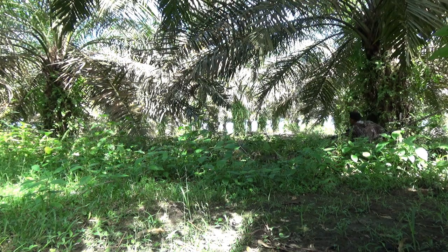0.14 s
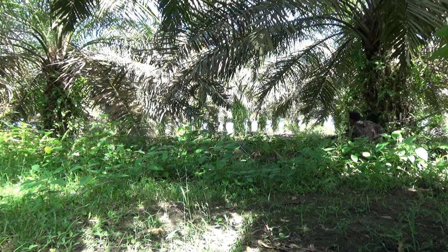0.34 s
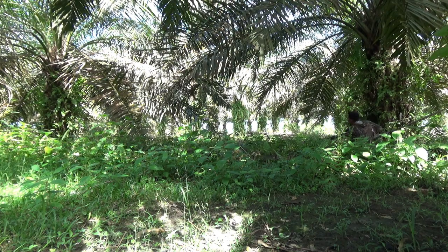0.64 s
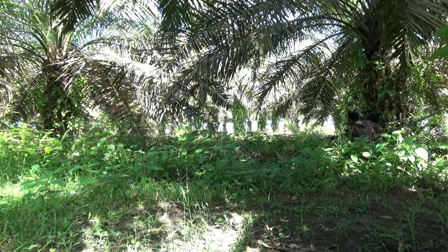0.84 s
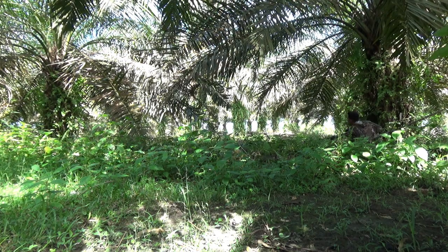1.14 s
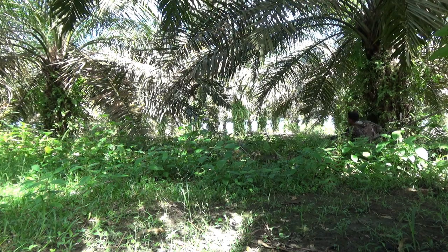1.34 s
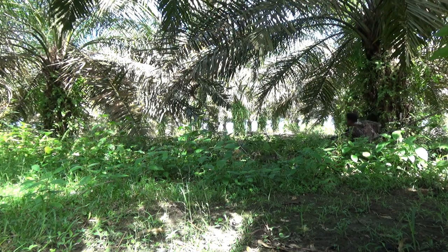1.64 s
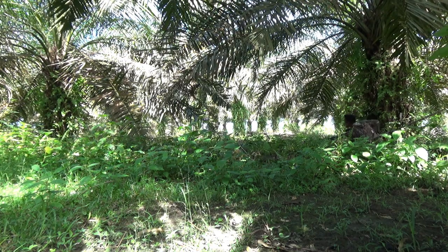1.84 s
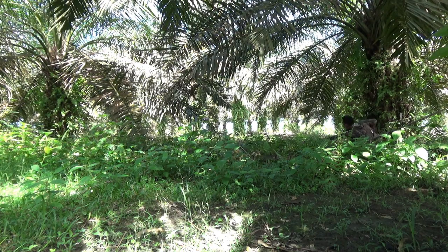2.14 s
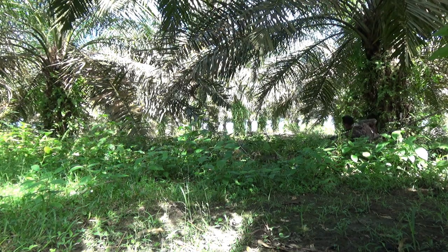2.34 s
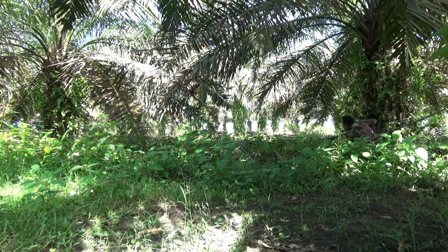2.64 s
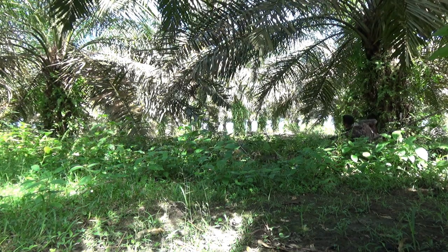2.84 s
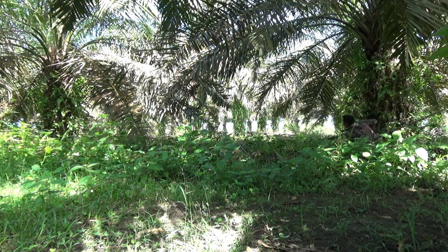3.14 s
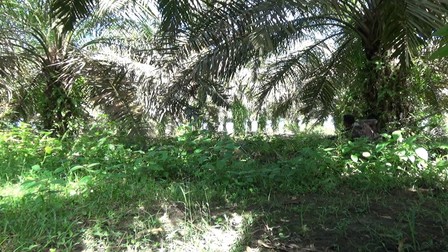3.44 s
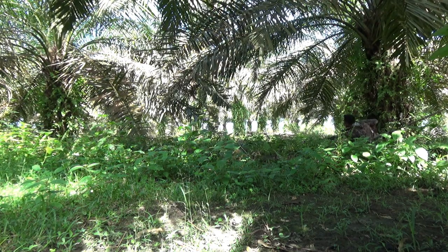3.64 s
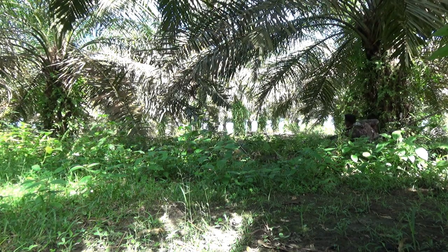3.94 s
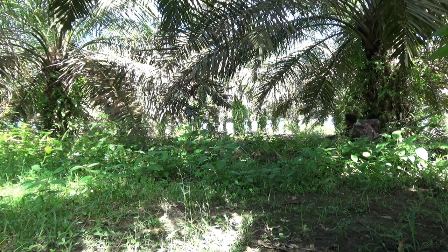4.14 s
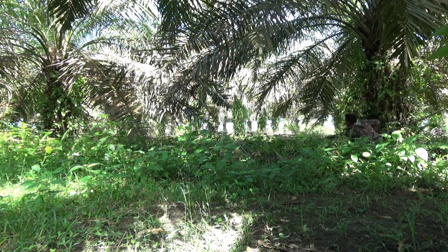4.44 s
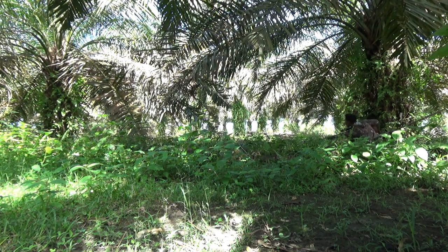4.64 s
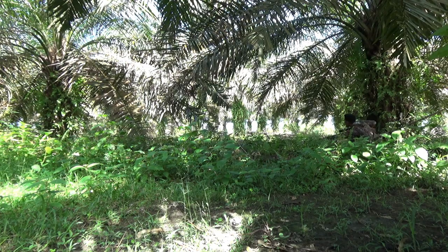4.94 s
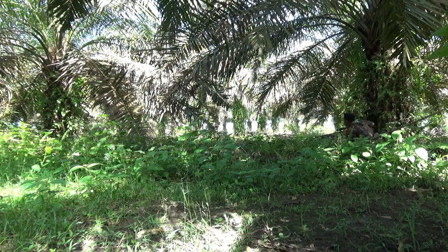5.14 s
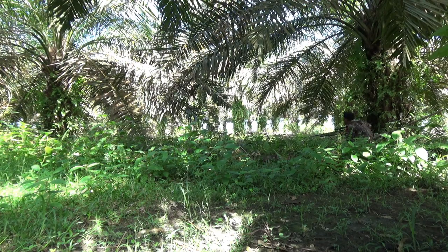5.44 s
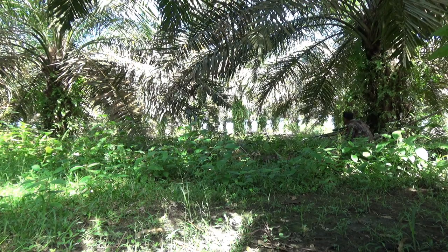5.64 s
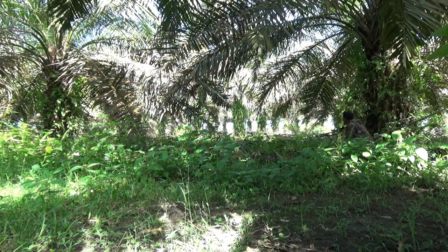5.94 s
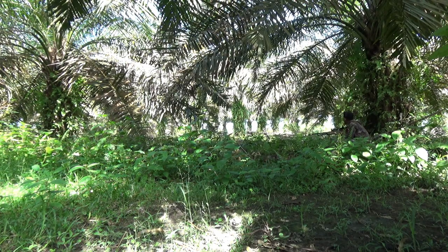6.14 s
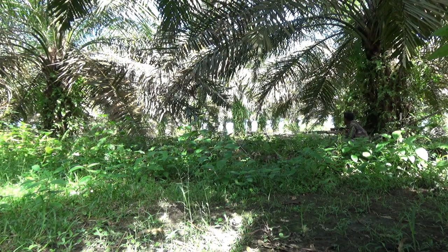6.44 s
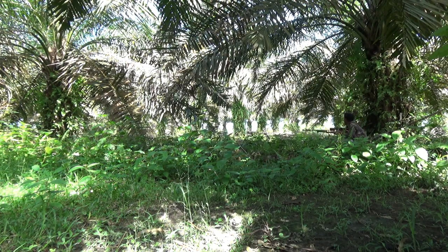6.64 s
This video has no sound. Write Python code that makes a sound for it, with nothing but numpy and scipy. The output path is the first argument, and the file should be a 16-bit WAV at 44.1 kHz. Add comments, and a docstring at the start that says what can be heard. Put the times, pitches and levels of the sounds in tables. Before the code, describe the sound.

Steady high insect drone with throbbing nearer singers, a dry twig tick, two gentle dove calls, and faint rough croaks far off near the end.

```python
"""Midday palm grove

A far cicada chorus, patchy noise in two bands, drones while nearer singers throb, each at its own beat:
their clicks ring a body resonance. Crickets pip in short tones; leaves and air hiss over a wavering hum.
A twig ticks as a struck resonance. A dove coos twice with a near pure tone: a soft note, a full note and
a long purr broken by puffs. Something croaks far off, in rough clicks through a low resonance.
"""
import sys
import numpy as np
from scipy import signal
from scipy.fft import rfft, irfft, next_fast_len
from scipy.io import wavfile
from scipy.ndimage import uniform_filter1d, map_coordinates

SR = 44100
rng = np.random.default_rng(int(sys.argv[2]) if len(sys.argv) > 2 else 0)


def inscribe(sig):
    """Save sig as 16-bit PCM at rate SR to the path in sys.argv[1].

    A 1-D sig is mono; a 2-D sig holds one channel per row.
    Samples are clipped to [-1, 1] before scaling.
    """
    pcm = np.round(np.clip(np.atleast_2d(sig).T, -1, 1) * 32767)
    wavfile.write(sys.argv[1], SR, pcm.astype(np.int16))


N = 298998
T = np.arange(N) / SR  # seconds


def amp(db):
    """Decibels to gain."""
    return 10 ** (np.asarray(db) / 20)


def unit(x):
    """Scaled to rms 1."""
    return x / np.sqrt(np.mean(x ** 2) + 1e-20)


def along(points, hz):
    """Values between (Hz, value) points on a log frequency axis."""
    point_hz, values = np.transpose(points)
    return np.interp(np.log(hz + 1), np.log(point_hz + 1), values)


def curves(rows):
    """One value per sample for each column after the time."""
    s, *columns = np.transpose(rows)
    return [np.interp(T, s, column) for column in columns]


def wobble(rate):
    """A smooth random curve, rate knots a second."""
    knots = rng.standard_normal(int(N * rate / SR) + 4)
    return map_coordinates(knots, [T * rate])


def filtered(x, response):
    """x times a complex response of frequency."""
    m = next_fast_len(N + SR // 2)
    spectrum = rfft(x, m) * response(np.fft.rfftfreq(m, 1 / SR))
    return irfft(spectrum, m)[..., :N]


def resonance(hz, width_hz):
    """A damped resonance passed twice, for steep skirts."""
    return lambda f: (1j * f * width_hz / (hz * hz - f * f + 1j * f * width_hz)) ** 2


# likeness of wide sounds at the two microphones: pitch_hz, likeness (0 unrelated, 1 identical)
MIC_LIKENESS = [(40, 1), (70, 0.99), (110, .995), (200, 0.93), (350, 0.64), (600, 0.16), (1200, 0.028),
                (2200, 0.19), (3500, 0.4), (4300, 0.74), (5700, 0.84), (6500, 0.53), (7300, 0.44),
                (8100, 1), (9000, .85), (11000, 0.96), (11700, 1)]


def rush(spectrum, patchy_db):
    """Stereo noise of rms 1: many blended sources, with patches of random gain in time and pitch."""
    z = signal.stft(rng.standard_normal((2, N)), nperseg=256)[2]
    field = uniform_filter1d(rng.standard_normal(z.shape[1:]), size=3, axis=0)
    field = uniform_filter1d(field, size=12, axis=1)
    pair = signal.istft(z * amp(patchy_db * unit(field)), nperseg=256)[1][:, :N]

    def mid_side_gain(hz):
        """More side against mid makes the two microphones less alike."""
        turn = np.arccos(np.clip(along(MIC_LIKENESS, hz), -1, 1)) / 2
        return amp(along(spectrum, hz)) * [np.cos(turn), np.sin(turn)]

    mid, side = filtered(pair, mid_side_gain)
    return unit(np.array([mid + side, mid - side]))


def grove(x, wet_db, t60):
    """Trunks and fronds scatter a sound into a tail (t60 in s), partly unlike at each microphone."""
    t = T[:SR // 3]
    shared, left, right = rng.standard_normal((3, len(t))) * amp(-60 * t / t60)
    tails = shared + 1.12 * np.array([left, right])
    tails /= np.linalg.norm(tails[0])
    return x + amp(wet_db) * signal.fftconvolve(x[None], tails, axes=1)[:, :N]


def singer(level_db, hz, width_hz, clicks, rough, beat=(5, 0), lead=0):
    """Buckling ribs click (per s) into the body resonance; the belly pumps the level up and down.

    beat is (swells per s, nominal depth in dB); level_db is before the tail and the final trim.
    """
    count = np.cumsum(clicks * (1 + .02 * wobble(5)) / SR) + .03 * wobble(200)
    is_click = np.diff(np.floor(count), prepend=0) > 0
    ribs = is_click * amp(rng.normal(0, 0.23, N))
    # part of each click is a puff of noise, which blurs the line spectrum
    puffs = rng.standard_normal(N) * np.abs(uniform_filter1d(ribs, size=330))
    rough = np.clip(rough, 0, 1)
    drive = np.sqrt(1 - rough) * unit(ribs) + np.sqrt(rough) * unit(puffs)
    # many close body modes merge into one rounded band
    body = unit(filtered(drive, lambda f: np.exp(-((f - hz) / width_hz) ** 2)))
    rate, depth_db = beat
    # each swell holds a while at full strength before it drops
    pump = np.tanh(1.6 * (np.cos(2 * np.pi * (rate * T + lead)) + .15))
    swell = amp(depth_db * pump / 2 + .4 * wobble(rate))
    return grove(body * unit(swell) * amp(level_db), wet_db=-5, t60=.07) * amp(-1)


def throb(song, *body, **voice):
    """A singer whose level and beat drift along its song."""
    level_db, lead = curves(song)
    return singer(level_db, *body, lead=lead, **voice)


def bouts(rows, rise, fall, rest_db):
    """Level in dB: each bout swells in, holds and fades at the same speeds (rise, fall in dB per s)."""
    each = []
    for s, db, hold in rows:
        each.append(db - rise * np.maximum(s - T, 0) - fall * np.maximum(T - s - hold, 0))
    return np.maximum(np.max(each, axis=0), rest_db)


# colours of the two far bands: pitch_hz, level_db (relative)
LOW_CHORUS = [(3800, -33.5), (4100, -15), (4400, -3), (4700, -2.5), (5100, -1), (5500, -6.5), (5800, -15),
              (6100, -6.5), (6600, -36)]
HIGH_CHORUS = [(5700, -34), (6100, -33), (6400, -8.5), (6700, -3.5), (7100, -2), (7400, -2), (7650, -10.5),
               (7900, -21), (8200, -39)]


def far_chorus():
    """Cicadas too far to tell apart blend into two bands of noise."""
    low = amp(-46.5 + 0.16 * wobble(2.0)) * rush(LOW_CHORUS, patchy_db=0.76)
    high = amp(-40 + 0.42 * wobble(1.29)) * rush(HIGH_CHORUS, patchy_db=0.84)
    return low + high


# near singers, one song each, before tail and trim: time_s, level_db, lead_swells (over a steady beat)
LOW_THROB = [(0, -47.5, .11), (2, -46.5, .13), (4, -47.5, .09), (5.1, -47, .14), (6.78, -47.5, -.14)]
HIGH_THROB = [(0, -50, 0.48), (4.4, -49.5, 0.4), (5.5, -50, 0.12), (6.5, -49.5, .01), (6.78, -58, 0)]
TRILL = [(0, -57, .2), (1.62, -57, .19), (1.68, -69, .15), (2.9, -64, 0), (3.1, -87, 0)]
FLUTTER = [(0, -48, 0.85), (1.5, -53, .4), (3.3, -58, 0.2), (5.5, -49, .2), (6.78, -48, .09)]
TREBLE_SHEEN = [(0, -64, 1), (2.5, -66.5, 1.2), (6.78, -64.5, 2)]
# a rasping singer heard in bouts: start_s (of full strength), level_db (before tail and trim), hold_s
RASPS = [(.2, -63, .2), (1.8, -62.5, 0.14), (2.5, -63.5, .07), (3.4, -64, .25), (3.88, -60, .08),
         (4.78, -62, .15), (5.8, -64, .1), (6.1, -61, 0.23)]


def near_singers():
    """Nearer singers, each with its own click rate, body resonance and beat."""
    low = throb(LOW_THROB, 5130, 430, clicks=92, rough=.75, beat=(7.0, 10))
    high = throb(HIGH_THROB, 5560, 330, clicks=90, rough=.75, beat=(5.85, 10))
    trill = throb(TRILL, 8820, 440, clicks=185, rough=0.57, beat=(7.5, 7.5))
    flutter = throb(FLUTTER, 7320, 370, clicks=73, rough=0.6, beat=(18.3, 12))
    buzz = singer(-53, 7140, 420, clicks=71, rough=0.67)  # no beat
    rasp_db = bouts(RASPS, rise=29, fall=81, rest_db=-69.5)
    rasp = singer(rasp_db, 3613, 270, clicks=190, rough=1.0, beat=(20.5, 2))
    # a fast flutter high in the treble, the same at both microphones
    sheen = throb(TREBLE_SHEEN, 14200, 900, clicks=150, rough=1.0, beat=(18.8, 8)).mean(axis=0)
    return low + high + trill + flutter + buzz + rasp + sheen


# colour of the shrill wash: pitch_hz, level_db (relative)
SHRILL_COLOUR = [(4760, -36), (8100, 0.5), (8600, 0.5), (9350, 3.5), (10100, -1), (11200, 3.5),
                 (11700, -1.5), (12500, -11), (14300, -1), (14900, -1.5), (15500, -16)]


def shrill_wash():
    """The shrill treble of the insects, blended into one broad band of noise."""
    return amp(-54.5 + 0.43 * wobble(0.77)) * rush(SHRILL_COLOUR, patchy_db=0.7)


# colour of the hiss of leaves and air: pitch_hz, level_db (relative)
AIR_COLOUR = [(13, -56), (22, -40), (91, -3.5), (147, -7), (268, -2), (344, -3.5), (390, -3), (461, -3),
              (699, -1), (809, -0.5), (917, -1), (1060, -1.5), (1130, -2), (3200, -6.5), (4160, -8),
              (7040, -120)]
# far low sounds: time_s, murmur_db (rms), hum_db (peak, before its waver)
FAR_LOWS = [(0, -67, -81), (.5, -78, -87), (1.5, -75, -82), (3.3, -82.5, -74.5), (3.8, -84, -87),
            (5.5, -83, -85), (6.78, -74, -91)]


def air():
    """Leaves and far traffic blend into a soft noise floor with a wavering hum."""
    murmur_db, hum_db = curves(FAR_LOWS)
    hum_size = amp(hum_db + 1.5 * wobble(4.3))
    hum = hum_size * np.sin(2 * np.pi * np.cumsum(149 + 2.58 * wobble(3)) / SR)
    murmur = amp(murmur_db) * unit(filtered(rng.standard_normal(N), resonance(202, 106)))
    hiss = amp(-58.5 + 0.36 * wobble(1.82)) * rush(AIR_COLOUR, patchy_db=0.8)
    return hiss * amp([[.2], [-.2]]) + hum + murmur


# small crickets, a row a train of pips:
# start_s, end_s, gap_s (pip to pip), peak_db (before unevenness and tail), pitch_hz, pip_s (peak to 1/e)
PIP_TRAINS = [(.01, .34, .04, -59, 2580, .004), (3.8, 3.91, .051, -60, 3480, .011)]


def crickets():
    """Each wing stroke is a short swelling tone, a little scratchy."""
    scratch = 1 + .25 * wobble(400)
    uneven = amp(1.3 * wobble(25))
    pips = np.zeros(N)
    for start, end, gap, db, hz, length in PIP_TRAINS:
        tone = amp(db) * np.sin(2 * np.pi * hz * T)
        for s in np.arange(start, end, gap):
            pips += tone * np.exp(-((T - s) / length) ** 2)
    return grove(pips * uneven * scratch, wet_db=-3, t60=.1)


# twig ticks: start_s, peak_db (before the tail), centre_hz, width_hz
TWIG_TICKS = [(.431, -32.5, 3070, 1300), (.435, -43, 3300, 1300), (1.435, -43, 1900, 1800)]


def twigs():
    """Dry ticks, each one short blow ringing a damped resonance of its own colour."""
    out = np.zeros(N)
    for s, db, hz, width_hz in TWIG_TICKS:
        blow = 1.0 * (np.arange(N) == round(s * SR))
        tick = filtered(blow, resonance(hz, width_hz))
        out += amp(db) * tick / np.abs(tick).max()
    return grove(out, wet_db=-2, t60=0.032)


# dove levels are before roughness, tail and microphone balance
# two clear notes of each call: loudest_s, length_s, top_pitch_hz, level_db (rms at the loudest)
CLEAR_NOTES = [(.948, .055, 585, -56), (1.203, .066, 660, -45), (3.945, .06, 572, -57),
               (4.203, .066, 656, -45.5)]
# long purr of each call: start_s, length_s
PURRS = [(1.391, .55), (4.389, .51)]
# held tone under a purr: share (of its length), pitch_hz, level_db (rms), roughness
PURR_TONE = [(0, 600, -68, 1), (.2, 630, -70, 1.1), (.45, 640, -70, 1.1), (.52, 635, -57, 1),
             (.66, 620, -57, .7), (.76, 590, -57, .45), (.87, 558, -62.5, .4), (1, 545, -68, .3)]
# puffs of air that open the purr: peak_s, peak_db
PURR_PUFFS = [(1.402, -58), (1.419, -52), (1.436, -45), (1.511, -66), (1.544, -49), (1.568, -54),
              (1.589, -48), (1.622, -48), (1.645, -49.5), (1.685, -56), (1.724, -53), (4.404, -53),
              (4.42, -54), (4.436, -56), (4.451, -56), (4.48, -57), (4.518, -53), (4.544, -46),
              (4.582, -46.5), (4.614, -50), (4.646, -55), (4.67, -49), (4.685, -54), (4.728, -56)]


def dove():
    """A near pure tone from the swollen throat; in the purr the air puffs, trembles and turns breathy."""
    puff_s = .011
    puffs = sum(amp(db) * np.exp(-4 * ((T - s) / puff_s) ** 2) for s, db in PURR_PUFFS)
    breath = unit(filtered(rng.standard_normal(N), resonance(664, 180)))

    def coo(start, end, hz, db, rough):
        """One breath through the throat."""
        edge = np.clip(np.minimum(T - start, end - T) / 0.0061, 0, 1)
        size = np.sqrt(2) * amp(db + rough * 2.8 * wobble(110)) + puffs
        turn = 2 * np.pi * np.cumsum(hz * (1 + .028 * rough * wobble(120))) / SR
        return edge * size * (np.sin(turn) + rough * amp(-7) * breath)

    lead_in, trail = 1.1, 0.76  # before and after the peak of a note, in note lengths
    arch_hz, arch_db = 70, 17  # most that pitch and level can lose at the shoulders of a note
    throat = np.zeros(N)
    for s, length, top_hz, top_db in CLEAR_NOTES:
        # pitch and level rise and fall together in an arch, the level with a flatter top
        arch = np.tanh((2 * (T - s) / length) ** 2)
        hz = top_hz - arch_hz * arch
        db = top_db - arch_db * arch ** 2
        throat += coo(s - lead_in * length, s + trail * length, hz, db, rough=.12)
    for s, length in PURRS:
        tone = curves([(s + share * length, *values) for share, *values in PURR_TONE])
        throat += coo(s, s + length, *tone)
    return grove(throat, wet_db=-9.5, t60=0.36) * amp([[.4], [-.4]])


# far croaks and higher creaks: start_s (of full strength), level_db (before tail and trim), hold_s
CROAKS = [(4.81, -66, .08), (5.13, -69, .08), (5.33, -71, .05), (5.62, -68, .03), (5.86, -68, .08),
          (6.1, -68, .15)]
CREAKS = [(5.92, -65, .04), (6.2, -71, .15)]


def far_croaks():
    """Rough trains of clicks through low resonances, in short bouts."""
    croak_db = bouts(CROAKS, rise=200, fall=66, rest_db=-92)
    creak_db = bouts(CREAKS, rise=90, fall=70, rest_db=-94)
    croak = singer(croak_db, 1085, 200, clicks=140, rough=0.98)
    creak = singer(creak_db, 1710, 280, clicks=140, rough=0.95)
    return croak + creak


def scene():
    """All sources at the two microphones."""
    croaks = far_croaks()
    insects = (far_chorus() + near_singers() + shrill_wash()) * amp([[.1], [-.1]])  # dB, left and right
    return insects + dove() + twigs() + crickets() + croaks + air()


def record(dry):
    """The microphones roll off the deep bass; the recorder keeps nothing above its band limit."""
    top_hz = 15760

    def response(hz):
        bass = hz ** 2 / (hz ** 2 + 55 ** 2)
        return bass * np.clip((top_hz - hz) / 60, 0, 1) ** 2

    return filtered(dry, response)


dry = scene()
out = record(dry)
inscribe(out)
```